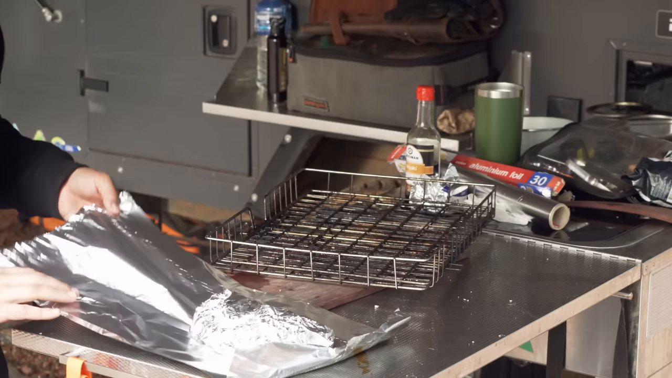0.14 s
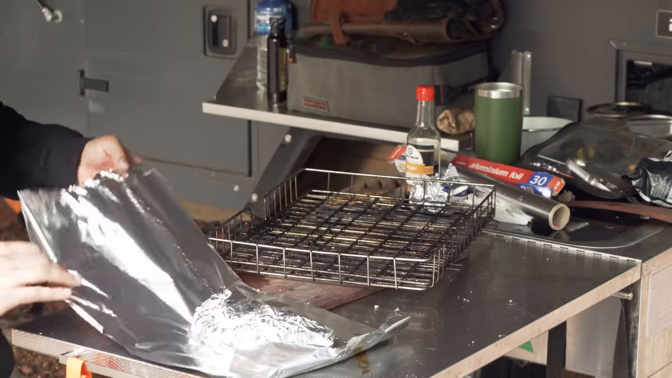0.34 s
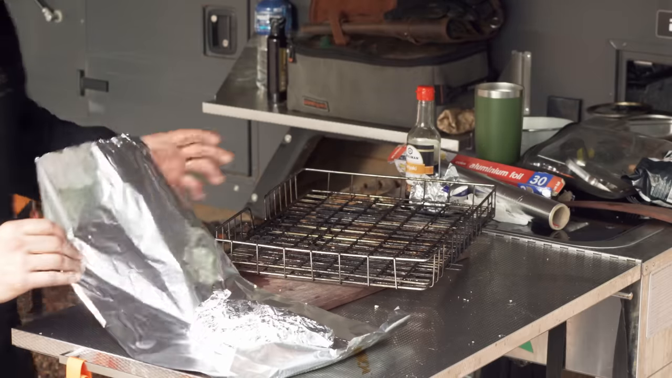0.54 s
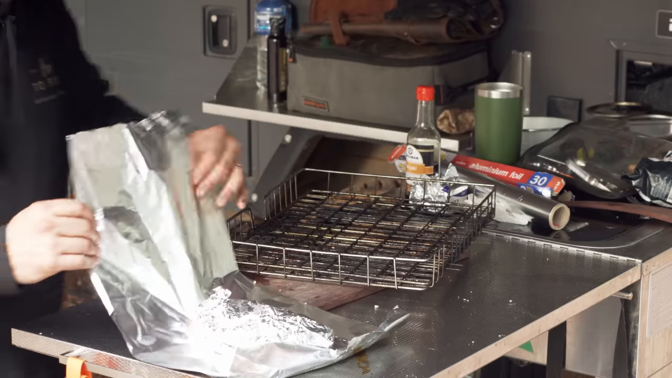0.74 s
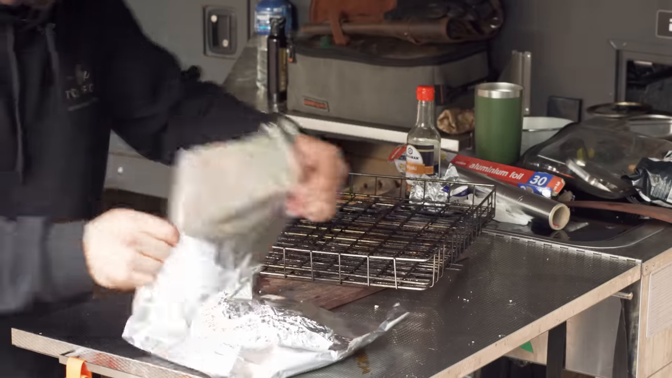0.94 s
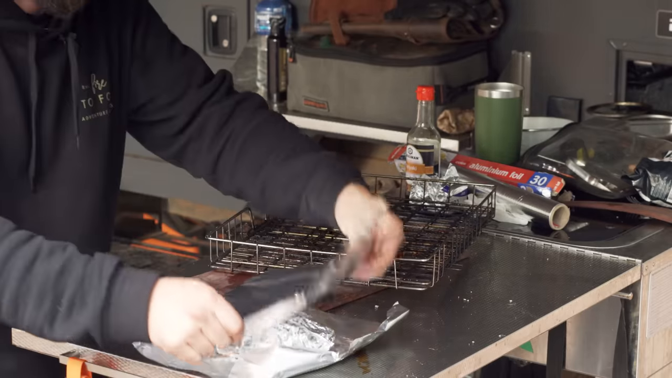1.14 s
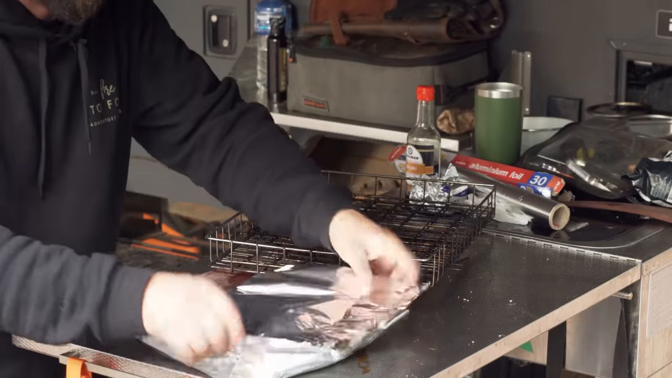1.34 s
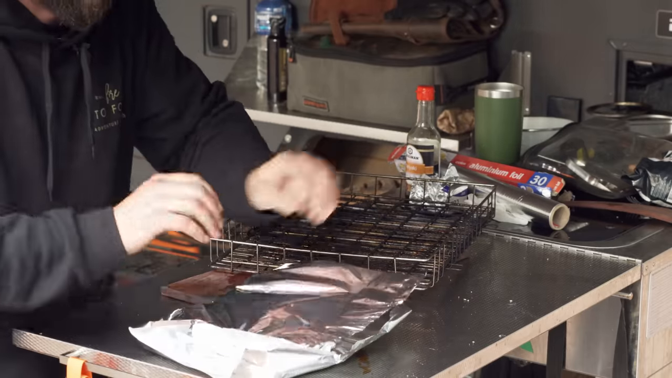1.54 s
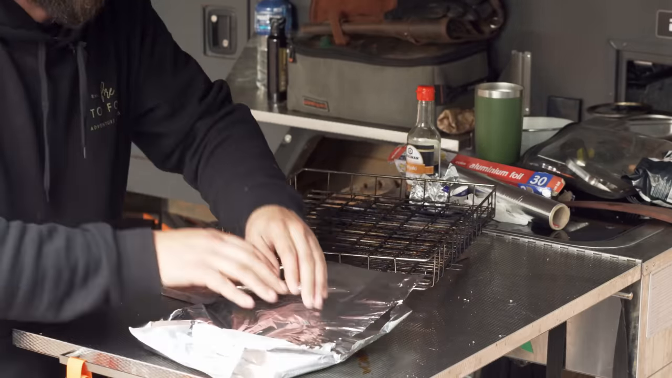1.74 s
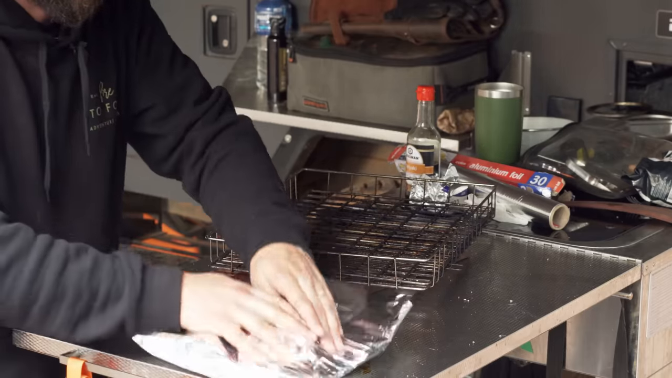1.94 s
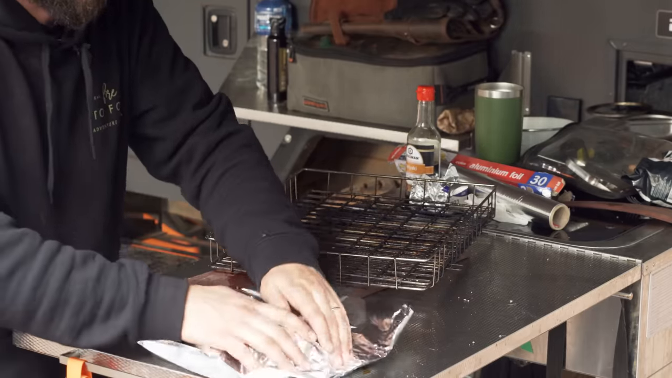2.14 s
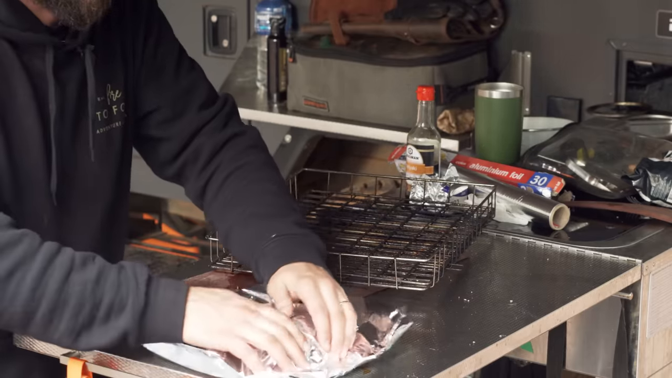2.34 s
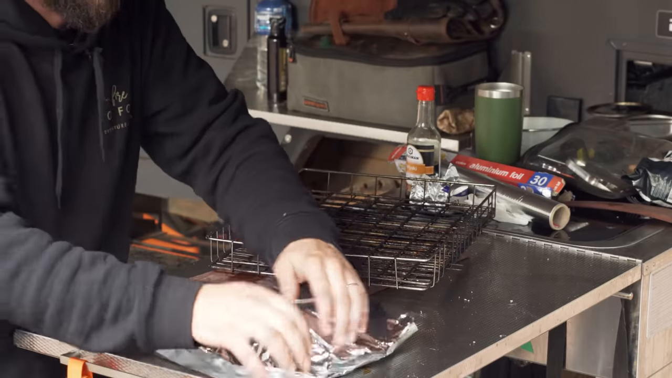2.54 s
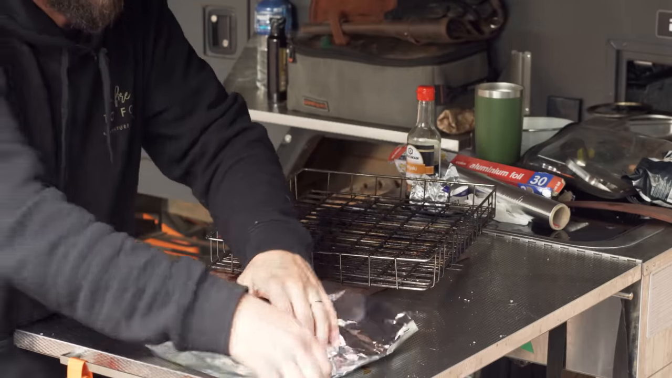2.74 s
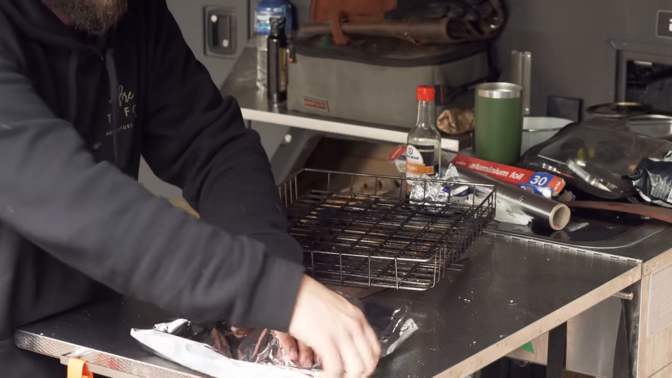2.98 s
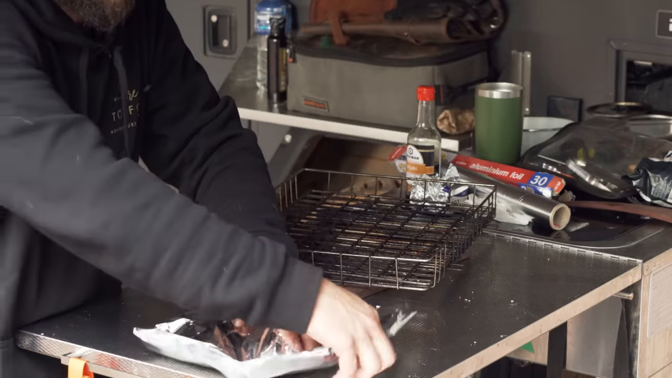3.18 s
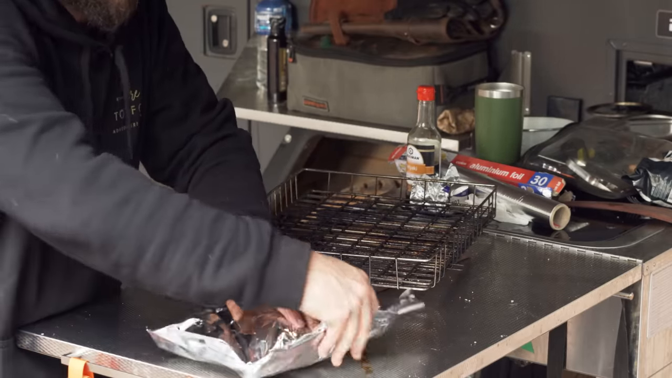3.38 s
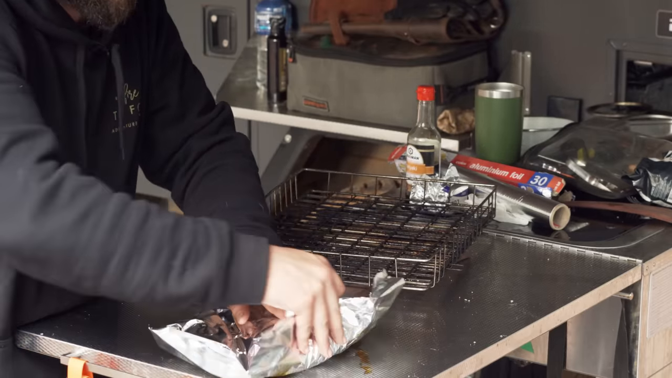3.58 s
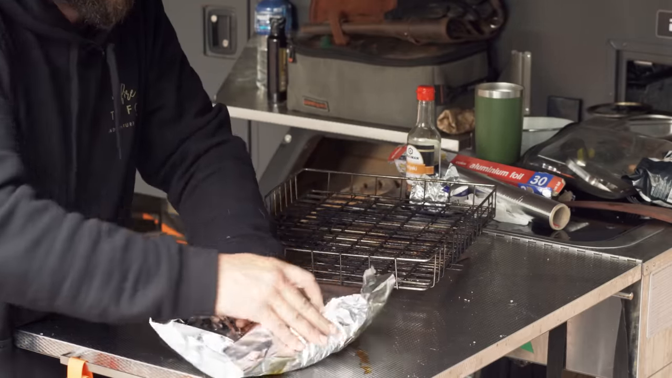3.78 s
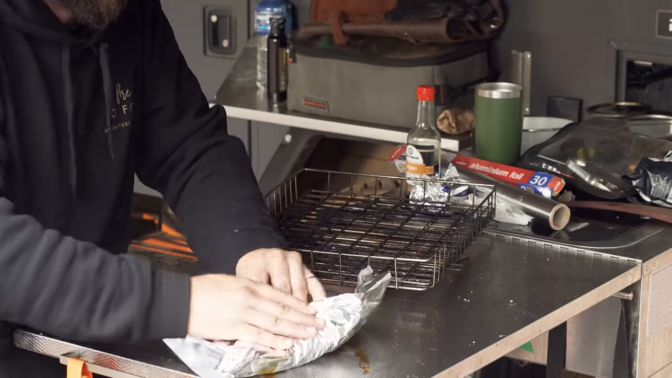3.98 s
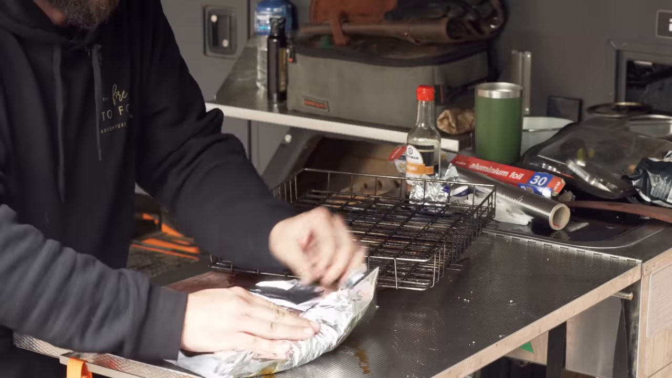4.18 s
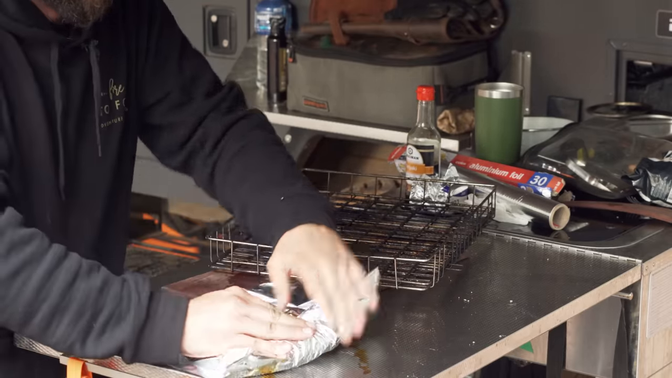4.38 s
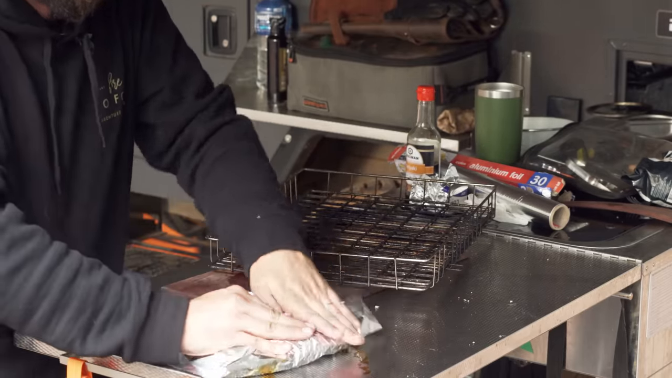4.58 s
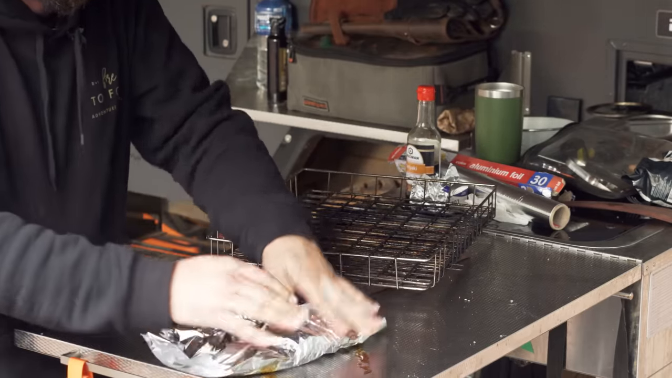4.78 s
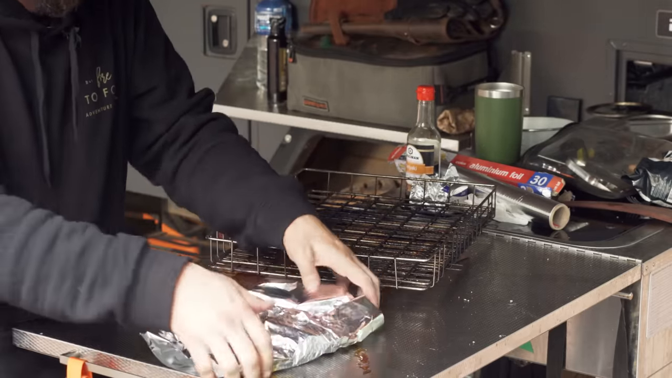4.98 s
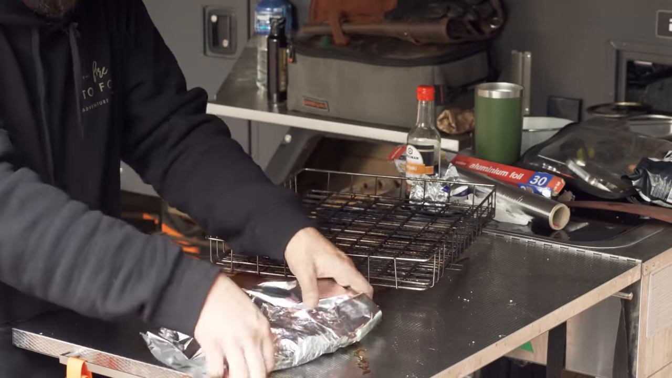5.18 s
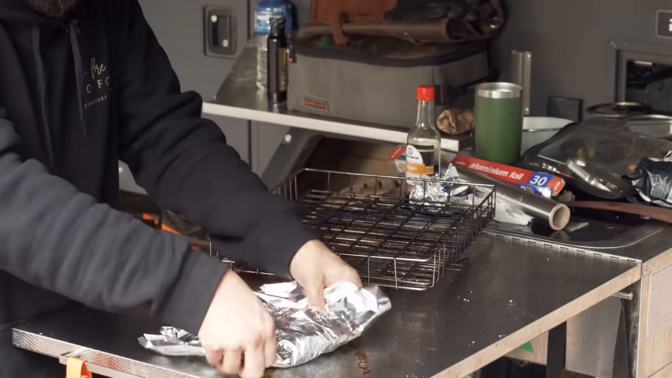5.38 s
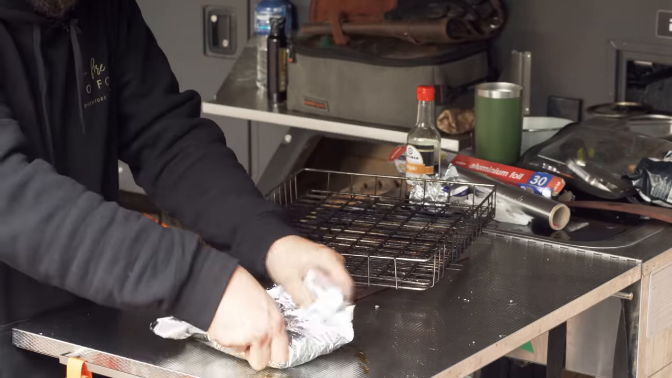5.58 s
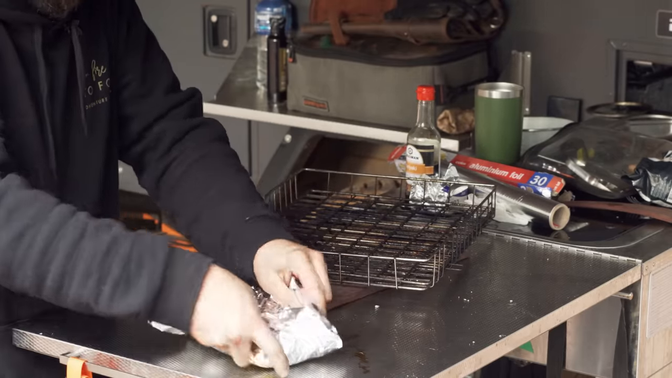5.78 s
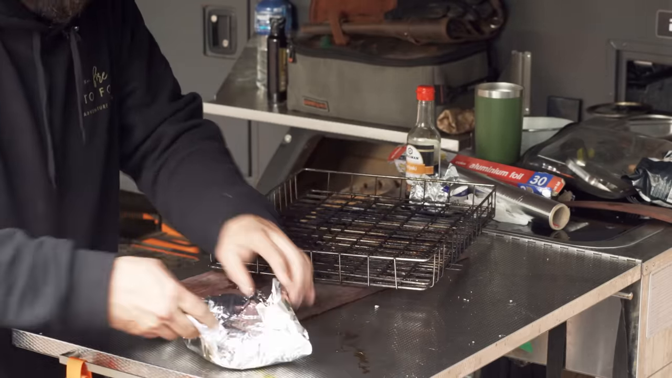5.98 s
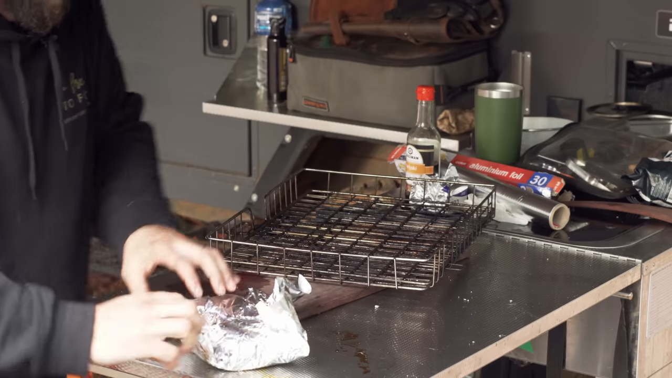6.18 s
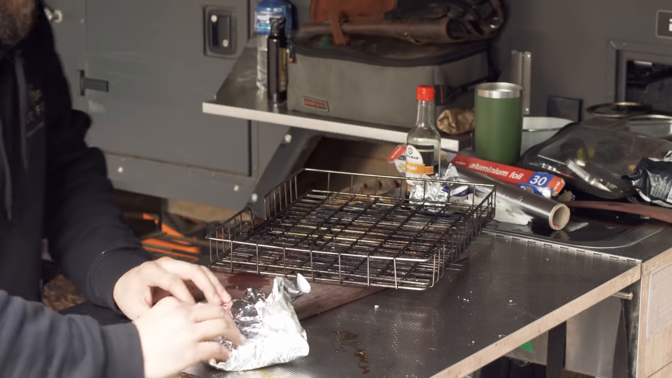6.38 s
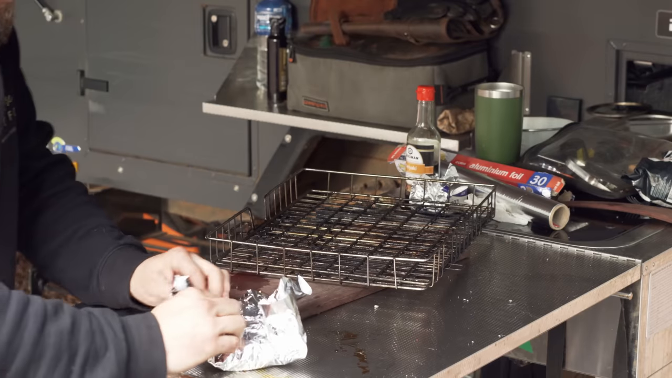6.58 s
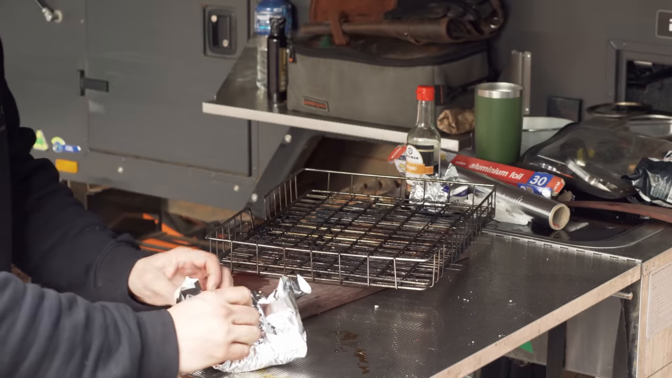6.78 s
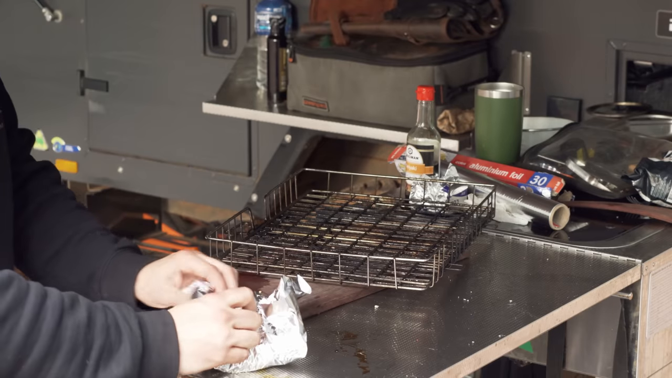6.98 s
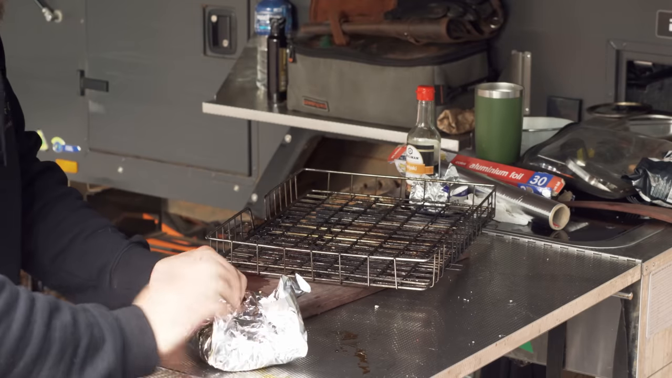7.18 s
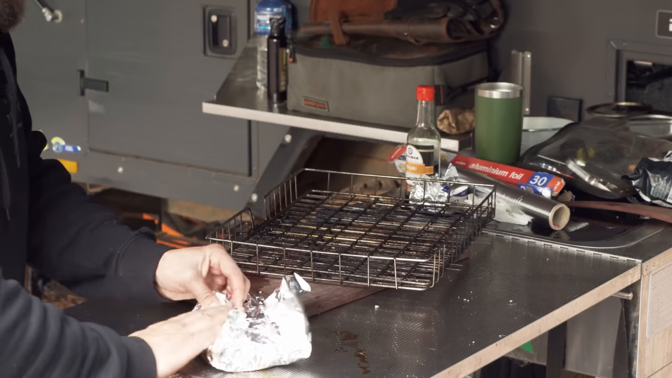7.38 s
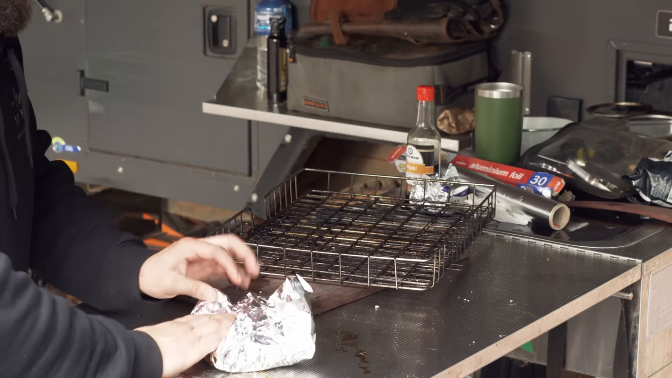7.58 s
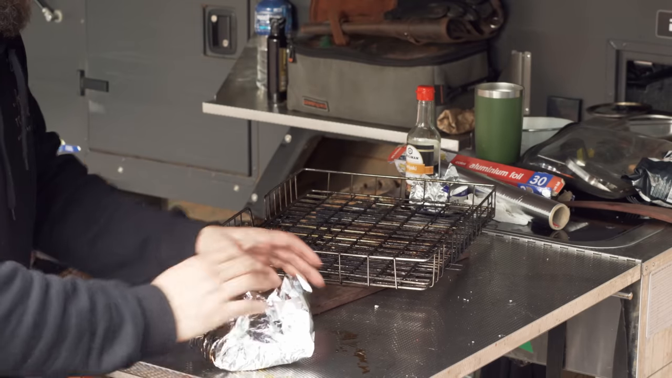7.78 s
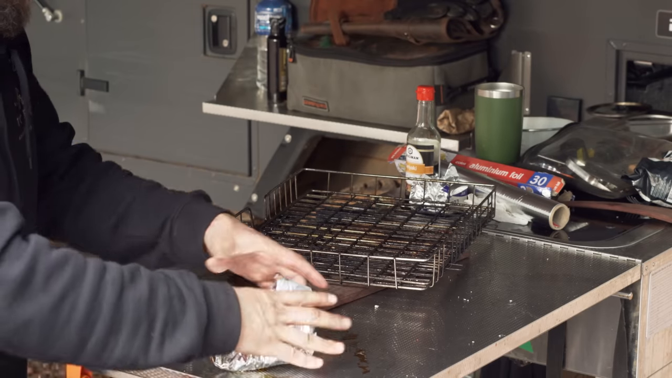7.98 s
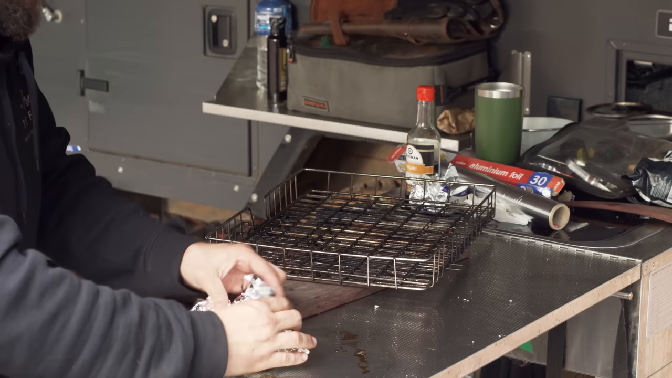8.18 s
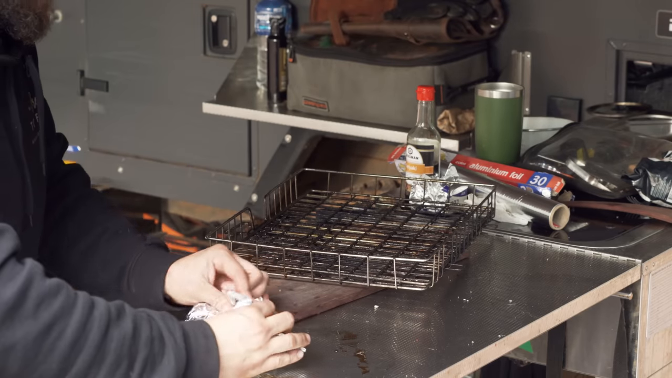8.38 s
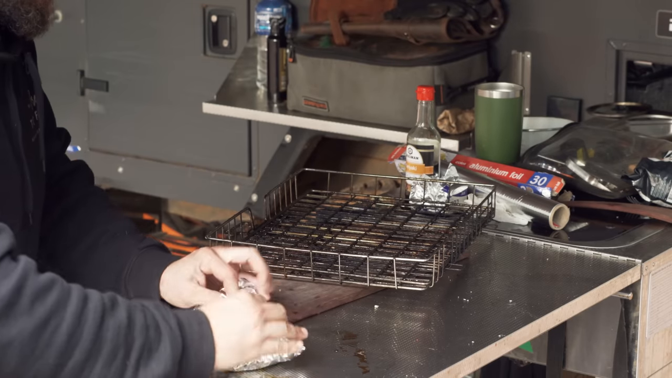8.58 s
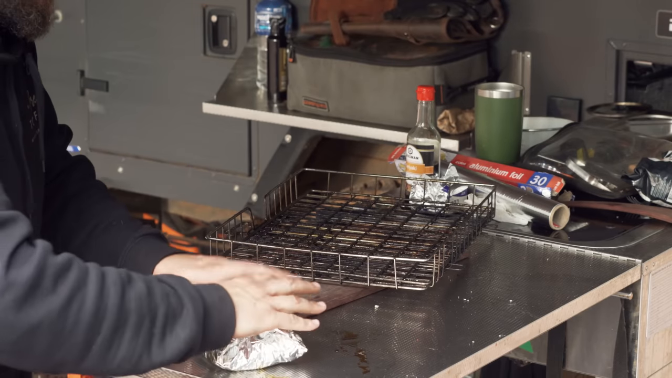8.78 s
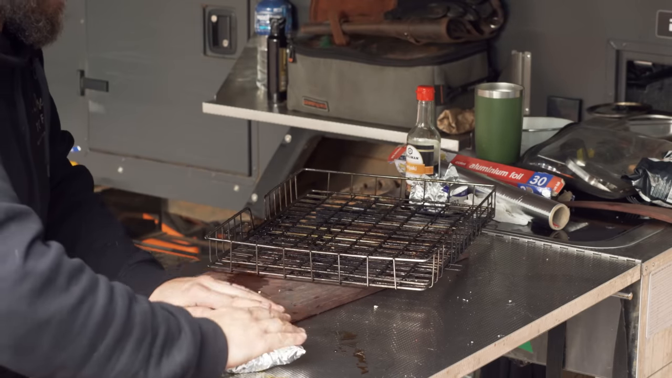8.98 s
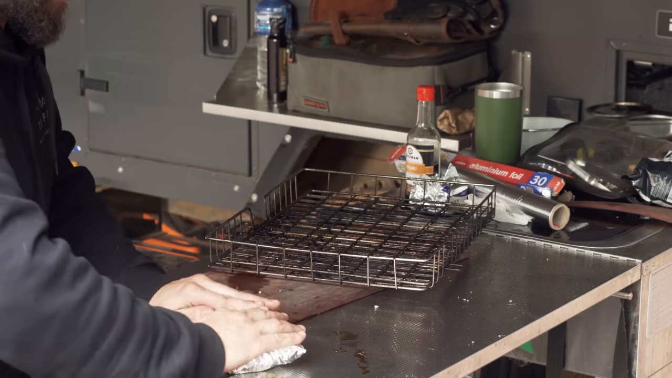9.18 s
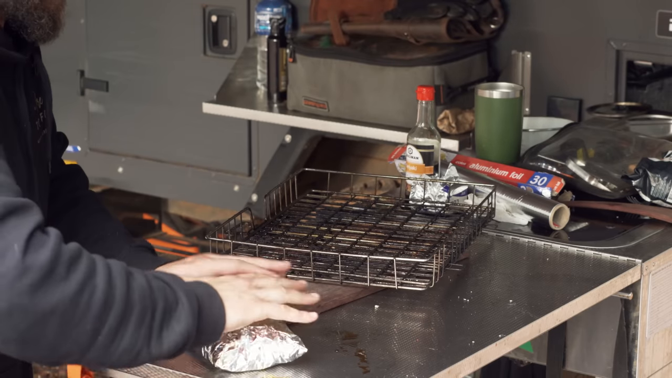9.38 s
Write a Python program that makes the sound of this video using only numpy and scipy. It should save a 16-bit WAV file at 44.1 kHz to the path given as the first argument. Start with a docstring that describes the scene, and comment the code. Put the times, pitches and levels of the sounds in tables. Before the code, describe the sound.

Aluminium foil crinkles close to the microphone from the start as hands fold a sheet over a parcel. It is brightest and loudest around 0.8 to 1.2 seconds, with sharp snaps, then eases to a short lull near 1.6 seconds. From about 1.9 seconds the foil is pressed and crumpled in uneven runs, slightly duller now, full of small clicks and sudden crackling cascades. The parcel drags and knocks softly on the steel table, most clearly around 3 to 3.3 seconds and again between 4.2 and 5.4. After a brief dip near 5 seconds the scrunching resumes, with crisp snaps from about 6 to 7.6 seconds. Shorter squeezes and presses follow, separated by small gaps, until about 9.4 seconds. The sound is fairly dry, with a quiet, distant outdoor hum behind it throughout.

```python
"""Wrapping a parcel in foil

Outdoors at a steel camp table, one microphone near the hands, the same in both channels.
Hands fold, crumple and press aluminium foil round a parcel: thousands of small facets buckle, each
a click of a few cycles, in clumps and sudden cascades. The parcel drags and knocks on the table top,
nearby surfaces throw back a short tail, and a quiet, distant hum lies behind it all."""
import sys
import numpy as np
from scipy import signal
from scipy.io import wavfile

SR = 44100
rng = np.random.default_rng(int(sys.argv[2]) if len(sys.argv) > 2 else 0)


def master(y):
    """Save y as 16-bit WAV."""
    cut = np.clip(np.atleast_2d(y).T, -1, 1)
    pcm = np.round(cut * 32767)  # scale
    wavfile.write(sys.argv[1], SR, pcm.astype(np.int16))


N = 415684
TIME = np.arange(N) / SR

# Tone colour of the crackling foil: frequency_hz, gain_db
FOIL_COLOUR = [(210, -41), (350, 3), (420, 3.5), (800, 6), (1100, 4), (1700, -0.5), (2200, 1.7),
               (2700, 2.6), (3400, 0), (4500, -2.5), (6300, -6.5), (7600, -13), (14700, -17.5),
               (15700, -13)]
# Facet sizes relative to the crumpling, bright as an open sheet and duller as a parcel:
# time_s, large_db, small_db, finest_db
FACET_BALANCE = [(0, -13, 6, 0), (.3, -27, 5.5, -1), (.55, -9, 5, -1.5), (.74, -17, 9, 1.5),
                 (.8, -12, 6.5, 2.5), (.88, -8, 6, 0), (.97, -6.5, 0, 0), (1.05, -5, 3, -1),
                 (1.2, -10.5, 0, 1), (1.45, -6.5, -0.5, -5.5), (1.9, -3.5, 0, -3.5), (2.5, -7.5, 0.5, -5),
                 (3.0, -9.5, -3.5, -4.5), (3.4, -5.5, -4, -4), (3.8, -2, 0.5, -4.5), (4.3, -6, -2.5, -5.5),
                 (4.48, -5, -2, -5.5), (4.65, -1.5, -2.5, -10.5), (4.85, -4.5, 2, -7.5),
                 (5.2, -8, -4, -7.5), (5.7, -1.5, -2, -8), (5.95, -4, -2, -9.5), (6.1, -3, -1, -5.5),
                 (6.2, -4, 5, -9), (6.4, -8.5, 0, -6.5), (7.0, -3, 2, -9), (7.5, -4, 3.5, -10),
                 (7.9, -4.5, -2.5, -13), (8.3, -4.5, 0, -7.5), (8.65, -5.5, 3.5, -8), (8.95, -3, 1, -9.5),
                 (9.15, -11, -6, -9), (9.43, -1, 3.5, -7)]


def gain_of(db):
    """Decibels to amplitude."""
    return 10 ** (np.asarray(db) / 20)


def unit_rms(x):
    """Scales to rms 1."""
    return x / np.sqrt(np.mean(x ** 2) + 1e-20)


def curves(rows):
    """Each column after a table's times, as one value a sample."""
    time_s, *columns = np.transpose(rows)
    return [np.interp(TIME, time_s, column) for column in columns]


def add(mix, start_s, sound):
    """Mixes a sound in, in place."""
    part = mix[max(round(start_s * SR), 0):][:len(sound)]
    part += sound[:len(part)]


def colour(x, points):
    """Minimum-phase filter through points of frequency_hz, gain_db."""
    hz, db = np.transpose(points)
    grid_hz = abs(np.fft.fftfreq(8192, 1 / SR))
    log_gain = np.log(gain_of(np.interp(np.log(grid_hz + 1), np.log(hz + 1), db)))
    response = np.exp(np.conj(signal.hilbert(log_gain)))
    return signal.oaconvolve(x, np.fft.ifft(response).real[:4096])[:N]


def ring(x, hz, width_hz):
    """A damped resonance struck by x."""
    r = np.exp(-np.pi * width_hz / SR)
    return signal.lfilter([1, 0, -r], [1, -2 * r * np.cos(2 * np.pi * hz / SR), r * r], x)


def wander(cutoff_hz):
    """Smooth random drift of rms about 1."""
    knots_s = np.arange(-1, N / SR + 1, .001)
    lowpass = signal.butter(1, cutoff_hz, fs=1000, output="sos")
    drift = signal.sosfiltfilt(lowpass, rng.standard_normal(len(knots_s)))
    return np.interp(TIME, knots_s, drift / drift[1000:-1000].std())


def clicks(per_s, spread_db, share=1):
    """Random clicks of either sign, a few much larger; a share below 1 thins them at equal power."""
    gap, sign, size, chance = rng.random((int(2000 * N / SR), 4)).T
    at = (np.cumsum(-np.log(1 - gap)) * SR / per_s).astype(int)
    live = at < N
    at, sign, size, chance = at[live], sign[live], size[live], chance[live]
    height = gain_of(spread_db * np.minimum(-np.log(1 - size), 4)) * np.sign(sign - .5)
    share = np.broadcast_to(share, N)[at]
    out = np.zeros(N)
    np.add.at(out, at, height * (chance < share) / np.sqrt(share))
    return out


def pop(hz, decay_cycles):
    """One buckle or knock: a sine that swells in half a cycle and dies away, peak 1."""
    turns = np.arange(4000) / SR * hz
    wave = np.sin(2 * np.pi * turns) * np.exp(-turns / decay_cycles) * np.minimum(2 * turns, 1)
    return wave / abs(wave).max()


def crumpling_db(rest_db=-70.5):
    """How hard the hands work the foil; between runs the sheet only ticks faintly."""
    # Runs of crumpling, each starting as the sheet lets go, one curve a run: time_s, level_db
    runs = [
        [(2.679, -49), (2.695, -45), (2.749, -44.5), (2.771, -45), (2.807, -49.5), (2.819, -52.5), (2.899, -47),
         (3.147, -46), (3.152, -45)],
        [(4.171, -39), (4.211, -47), (4.299, -42.5), (4.417, -50.5), (4.485, -36.5), (4.517, -51),
         (4.653, -40.5), (4.695, -47), (4.881, -55), (4.91, -68)],
        [(6.28, -62), (6.298, -48.5), (6.416, -44), (6.632, -41), (6.732, -53), (6.76, -44.5), (6.832, -53),
         (6.86, -62), (6.878, -48), (6.93, -76.5)],
        [(7.915, -56.5), (8.061, -41), (8.071, -47.5), (8.159, -41.5), (8.411, -46.5), (8.421, -43),
         (8.611, -56), (8.745, -52), (8.807, -79), (8.812, -73)],
        [(0.0, -48.5), (0.03, -46.5), (0.102, -54), (0.13, -42.5), (0.208, -49), (0.216, -42), (0.318, -45),
         (0.342, -53), (0.426, -40.5), (0.518, -53), (0.61, -48.5), (0.65, -61), (0.657, -49)],
        [(0.769, -40), (0.783, -35), (0.829, -43.5), (0.853, -37), (0.887, -37), (0.903, -33), (0.965, -37),
         (0.987, -35), (1.011, -45), (1.361, -41), (1.481, -58), (1.487, -53), (1.58, -73.5)],
        [(3.153, -39.5), (3.279, -43), (3.293, -40.5), (3.341, -45.5), (3.395, -41), (3.829, -48), (3.989, -44),
         (4.021, -48.5), (4.111, -42), (4.131, -46), (4.143, -42), (4.163, -44), (4.17, -40.5)],
        [(5.143, -56), (5.271, -39.5), (5.327, -45), (5.415, -39.5), (5.619, -41.5), (5.635, -37.5),
         (5.785, -55), (5.961, -43), (6.071, -49.5), (6.089, -41), (6.109, -52.5), (6.171, -56.5), (6.27, -70)],
        [(1.855, -47.5), (1.875, -43), (2.015, -39.5), (2.363, -48.5), (2.483, -44.5), (2.587, -55),
         (2.66, -77)],
        [(7.009, -39), (7.015, -39.5), (7.103, -46.5), (7.121, -41.5), (7.153, -54), (7.241, -50.5),
         (7.36, -59)],
        [(7.368, -47), (7.406, -40.5), (7.444, -44.5), (7.458, -45), (7.478, -49), (7.604, -52), (7.65, -75.5)],
        [(7.72, -62), (7.752, -47.5), (7.792, -56.5), (7.818, -40.5), (7.836, -48.5), (7.862, -74), (7.89, -86)],
        [(8.815, -58.5), (8.935, -40.5), (8.941, -44), (9.099, -44), (9.127, -51.5), (9.131, -55), (9.17, -65)],
        [(9.171, -55), (9.185, -59), (9.311, -53), (9.317, -51), (9.391, -60), (9.405, -61), (9.426, -76)],
        [(0.658, -49.5), (0.742, -47), (0.768, -47)],
        [(6.963, -53), (7.005, -56.5), (7.008, -59)],
    ]
    level = np.full(N, rest_db)
    for run in runs:
        time_s, db = np.transpose(run)
        inside = (TIME >= time_s[0]) & (TIME <= time_s[-1] + .002)
        level[inside] = np.interp(TIME[inside], time_s, db)
    return level


def distant_hum(level_db=-62):
    """Far-off outdoor hum and hiss that swells a little."""
    # Spectrum of the open air: frequency_hz, gain_db
    air_colour = [(15, -17), (25, -3), (72, 2), (275, 2.5), (498, -4), (570, -1), (1180, -11), (2440, -19),
                  (10500, -34), (15700, -24)]
    swell_db = 2 * wander(1.1)
    return gain_of(level_db + swell_db) * unit_rms(colour(rng.standard_normal(N), air_colour))


def reflections(x, t60_s=.07):
    """The table top and the side of a vehicle throw back a short, sparse tail."""
    taps = np.zeros(6000)
    at = np.arange(40, 5960, 20) + rng.integers(0, 20, 296)
    taps[at] = rng.choice([-1., 1.], len(at)) * gain_of(-60 * at / SR / t60_s)
    return signal.oaconvolve(x, taps / np.linalg.norm(taps))[:N]


def camp_table(rise_s=.0073, t60_s=.17):
    """Slips of the dragged parcel and knocks ring the steel top; the legs sway below."""
    # The parcel is shoved over the top: start_s, length_s, drag_db, sway_db
    shoves = [(0.305, 0.034, -71, -59), (0.783, 0.027, -59, -68), (0.87, 0.12, -52.5, -53.5),
              (1.114, 0.056, -54, -56), (1.31, 0.03, -65, -63), (1.444, 0.012, -52, -48),
              (1.85, 0.25, -67, -67), (2.68, 0.073, -69, -67), (2.977, 0.11, -45, -57),
              (3.265, 0.056, -48, -69), (3.383, .03, -59, -60), (3.585, 0.038, -53, -72),
              (4.16, 0.012, -61, -46), (4.27, 0.027, -58, -66), (4.45, .05, -54, -61),
              (4.627, 0.068, -62, -63), (5.004, 0.071, -62, -56), (5.104, 0.071, -49.5, -69),
              (5.25, 0.037, -52, -64), (5.417, 0.011, -47, -78), (5.5, 0.029, -67, -60),
              (5.622, 0.022, -51, -82), (5.957, .06, -61, -69), (6.317, 0.024, -50, -56),
              (7.002, 0.021, -58, -78), (7.385, 0.03, -66, -72), (7.472, 0.036, -70, -62),
              (7.727, 0.022, -67, -75), (7.982, .04, -54, -63), (8.226, .04, -70, -68),
              (8.405, 0.012, -68, -78), (8.92, 0.12, -64, -66)]
    # Resonances of the top: pitch_hz, width_hz, relative_db
    top_modes = [(195, 100, -5), (270, 80, 0), (340, 90, -2), (440, 110, -8)]
    # Fingers and parcel knock on the table: start_s, peak_db, pitch_hz
    knocks = [(0.023, -46, 303), (0.216, -47, 300), (.344, -37, 483), (.352, -49, 198), (.89, -39, 534),
              (.984, -44, 83.4), (1.455, -49, 190), (1.461, -30.5, 650), (2.98, -34.5, 476),
              (2.995, -31.5, 270), (3.006, -32.5, 450), (3.033, -35, 301), (3.064, -37, 258),
              (3.274, -36, 344), (3.289, -33.5, 316), (4.17, -42.5, 141), (4.171, -33, 710),
              (4.46, -30, 513), (5.011, -43, 287), (5.107, -53, 406), (5.128, -35, 282), (5.415, -36, 721),
              (6.315, -46, 250), (6.327, -41, 596)]
    handling_db = crumpling_db() + curves(FACET_BALANCE)[0]  # large facets pass crumpling to the table
    drag_gain, sway_gain = gain_of(handling_db - 14.5), gain_of(handling_db - 26.5)
    t = TIME[:SR // 2]
    for start_s, length_s, drag_db, sway_db in shoves:
        shape = np.minimum(t / rise_s, 1) * gain_of(-60 * np.maximum(t - length_s, 0) / t60_s)
        add(drag_gain, start_s, gain_of(drag_db) * shape)
        add(sway_gain, start_s, gain_of(sway_db) * shape)
    slips = clicks(per_s=300, spread_db=1.8) * gain_of(1.8 * wander(25))
    top = sum(gain_of(db) * unit_rms(ring(ring(slips, hz, width), hz, width))
              for hz, width, db in top_modes)
    leg_band = signal.butter(2, [45, 170], "bandpass", fs=SR, output="sos")
    sway = signal.sosfilt(leg_band, clicks(per_s=200, spread_db=1.8))
    out = unit_rms(top) * drag_gain + unit_rms(sway) * sway_gain
    for start_s, db, hz in knocks:
        add(out, start_s, gain_of(db) * pop(hz, decay_cycles=1.3))
    return out


def crease_ticks(decay_s=.0013, gentle_tick_db=-64, gentle_work_db=-58):
    """Sharp creases tick across all facets at once; they stand out most when the hands ease off."""
    onsets = abs(clicks(per_s=110, spread_db=2.2))
    bursts = signal.lfilter([1], [1, -np.exp(-1 / (decay_s * SR))], onsets)
    thin = np.diff(colour(bursts * rng.standard_normal(N), FOIL_COLOUR), prepend=0)
    return unit_rms(thin) * gain_of(gentle_tick_db + .8 * (crumpling_db() - gentle_work_db))


def foil_snaps():
    """Single facets buckle loudly and ring briefly at their own pitch; loose flaps ring longer."""
    # Loud single buckles: start_s, peak_db, pitch_hz
    buckles = [(.7694, -21, 3450), (.8505, -21, 2580), (.8686, -19, 2950), (.9025, -21, 3380),
               (.988, -20, 2690), (1.1302, -25, 4950), (1.1622, -23, 4820), (1.9916, -24, 2050),
               (2.0437, -24, 2690), (2.0957, -25, 2580), (3.1556, -25, 2450), (3.7199, -26, 2800),
               (4.1728, -27, 2330), (4.4855, -26, 3470), (5.4072, -25, 2280), (5.646, -23, 2580),
               (6.0214, -29, 2350), (6.0866, -28, 3170), (6.4193, -26, 3140), (6.4704, -27, 2400),
               (6.9642, -38, 3980), (7.0167, -25, 2690), (7.0269, -25, 1340), (7.0753, -21, 2990),
               (7.1232, -26, 3530), (7.1787, -31, 3700), (7.2354, -27, 2730), (7.2525, -28, 2950),
               (7.4115, -24, 3600), (7.4593, -25, 2560), (7.5066, -28, 2670), (7.5182, -27, 3250),
               (7.5974, -29, 2330), (8.0937, -29, 2390), (8.1562, -26, 3700), (8.1923, -26, 2780),
               (8.3245, -28, 2990), (8.5258, -30, 2990), (9.0241, -25, 5620), (9.1233, -28, 3270),
               (9.32, -29, 2990)]
    # A loose flap flicks and rings on: start_s, level_db, pitch_hz, decay_cycles
    flaps = [(1.487, -51, 3000, 14), (1.504, -49, 5340, 25), (1.607, -67, 2590, 15), (4.945, -76, 2600, 67),
             (5.062, -60, 5250, 66), (5.062, -60, 6450, 60), (9.393, -52, 4560, 18)]
    out = np.zeros(N)
    for start_s, db, hz in buckles:
        add(out, start_s, gain_of(db) * pop(hz, decay_cycles=.75))
    for start_s, db, hz, cycles in flaps:
        modes_hz = hz * (1 + .023 * rng.standard_normal(4))  # a creased flap has close, beating modes
        add(out, start_s, gain_of(db) * sum(pop(mode_hz, cycles) for mode_hz in modes_hz) / 2)
    return out


def foil_crackle(cascade_rise_s=.0009, cascade_t60_s=.068, peak_to_mean_power=14):
    """Facets of all sizes buckle; the hands drive them all, a cascade mostly those near its own pitch."""
    # A fold gives way in a cascade of buckles: start_s, strength_db, pitch_hz
    cascades = [(.1153, -37, 2680), (.2109, -32, 2730), (.3701, -30, 3100), (.5824, -30, 2690),
                (0.602, -26, 2550), (.6574, -35, 2600), (.7682, -29, 3350), (.843, -30, 4070),
                (.8936, -19, 2300), (1.047, -22.5, 1690), (1.1189, -18.5, 2030), (1.488, -37, 2990),
                (1.607, -34.5, 2560), (1.905, -20.5, 2080), (2.235, -21, 1500), (2.367, -37, 2960),
                (2.692, -23, 3600), (2.74, -28, 2400), (2.8809, -30, 2890), (2.9208, -27.5, 2440),
                (3.1522, -38, 2800), (3.3847, -21, 2640), (3.5574, -24, 1640), (3.6434, -26, 2560),
                (3.7105, -36, 2740), (3.9467, -29, 805), (4.044, -45, 2450), (4.1709, -36, 2600),
                (4.3799, -36, 2540), (4.4348, -22.5, 2470), (4.465, -21, 900), (4.601, -24, 816),
                (4.7625, -27, 2720), (4.93, -45, 1140), (5.0612, -43, 4890), (5.1487, -29, 2460),
                (5.217, -27, 2760), (5.4061, -33, 1080), (5.49, -32, 3600), (5.5797, -41, 790),
                (5.765, -28.5, 4200), (5.915, -30, 864), (6.0187, -29, 2420), (6.0864, -31, 3230),
                (6.136, -26.5, 3150), (6.1694, -30, 2770), (6.2956, -44, 2720), (6.3574, -23, 2580),
                (6.4196, -21, 3320), (6.5163, -21, 2330), (6.6987, -26.5, 2470), (6.755, -34, 2320),
                (6.8763, -28, 2980), (6.974, -27, 3000), (7.0105, -27, 2750), (7.0743, -36, 2690),
                (7.122, -30, 3760), (7.1776, -27, 3640), (7.2045, -28.5, 2450), (7.2334, -28, 1030),
                (7.2514, -37, 3110), (7.304, -29, 2410), (7.3447, -36, 2540), (7.3928, -19, 1390),
                (7.3983, -19.5, 4130), (7.4584, -34, 2620), (7.5053, -44, 2700), (7.5187, -45, 3000),
                (7.579, -22.5, 1010), (7.596, -26, 1300), (7.6784, -57, 4000), (7.693, -37, 5560),
                (7.7368, -27.5, 1860), (7.8131, -35, 795), (7.916, -32, 3380), (7.97, -33, 2780),
                (8.151, -29, 2470), (8.2234, -25, 835), (8.296, -25.5, 2760), (8.419, -18, 1240),
                (8.6418, -35, 2730), (8.8483, -31, 1290), (8.9002, -23.5, 1410), (8.963, -21.5, 1060),
                (9.1222, -42, 3240), (9.185, -41, 2950), (9.2594, -32, 1570), (9.315, -27, 1370),
                (9.3477, -29.5, 1340), (9.392, -37, 1160)]
    # The commonest facets of the fold under the fingers: time_s, pitch_hz
    fold_pitch = [(0.0, 2940), (0.68, 2720), (0.76, 3080), (0.86, 2750), (1.29, 2630), (1.49, 3000),
                  (1.6, 2580), (2.25, 2570), (4.09, 2540), (5.96, 3070), (6.04, 2630), (6.09, 3040),
                  (6.27, 2790), (7.69, 2680), (7.74, 2920), (8.06, 2710), (8.4, 2900), (8.74, 2710),
                  (9.27, 2920), (9.43, 2720)]
    fold_hz, = curves(fold_pitch)
    work_db = crumpling_db()
    large_db, small_db, finest_db = curves(FACET_BALANCE)
    finest_db += 1.05 * wander(45)  # the finest creases come and go by themselves
    t = TIME[:5000]
    rise = np.minimum(t / cascade_rise_s, 1)
    cascade_shape = rise * gain_of(-60 * t / cascade_t60_s) ** 2 / peak_to_mean_power
    sheet_power = gain_of(work_db) ** 2
    for start_s, db, _ in cascades:  # a cascade also shakes the whole sheet
        add(sheet_power, start_s, .067 * gain_of(db) ** 2 * cascade_shape)
    clumps = unit_rms(gain_of(1.3 * wander(35) + .8 * wander(250)))
    share = np.clip(gain_of(work_db + 51), .3, 1)  # gentle handling buckles fewer facets
    steady, driven = np.zeros((2, 3, N))  # at even stress, to set the scale, and under the hands
    for hz in np.geomspace(420, 14500, 30):
        size = int(hz > 1500) + int(hz > 7000)  # large, middle or finest facets
        near_fold_db = 1.6 * np.exp(-(np.log2(hz / fold_hz) / .12) ** 2)
        middle_db = near_fold_db + small_db * (hz > 4000)
        power = sheet_power * gain_of((large_db, middle_db, finest_db)[size]) ** 2
        for start_s, db, cascade_hz in cascades:
            nearness = np.exp(-(np.log2(hz / cascade_hz) / .31) ** 2)
            add(power, start_s, nearness * gain_of(db) ** 2 * cascade_shape)
        buckles = clicks(per_s=min(hz * .2, 1900), spread_db=2.3, share=share)  # small facets are many
        facets = unit_rms(ring(buckles, hz, hz / 4)) * np.sqrt(hz)  # equal power per hertz
        facets *= gain_of(1.4 * wander(27))
        steady[size] += facets
        driven[size] += facets * np.sqrt(power) * clumps
    return sum(colour(sound, FOIL_COLOUR) / colour(reference, FOIL_COLOUR).std()
               for sound, reference in zip(driven, steady))


def scene():
    """Foil and table up close, with their reflections, over the distant hum."""
    near = foil_crackle() + crease_ticks() + foil_snaps() + camp_table()
    mix = near + gain_of(-14) * reflections(near) + distant_hum()
    return np.array([mix, mix])


def record(dry):
    """The recorder cuts off steeply above 15.9 kHz."""
    lowpass = signal.firwin(1023, 15900, window=("kaiser", 9), fs=SR)
    return signal.oaconvolve(dry, lowpass[None], "same")


dry = scene()
out = record(dry)
master(out)
```